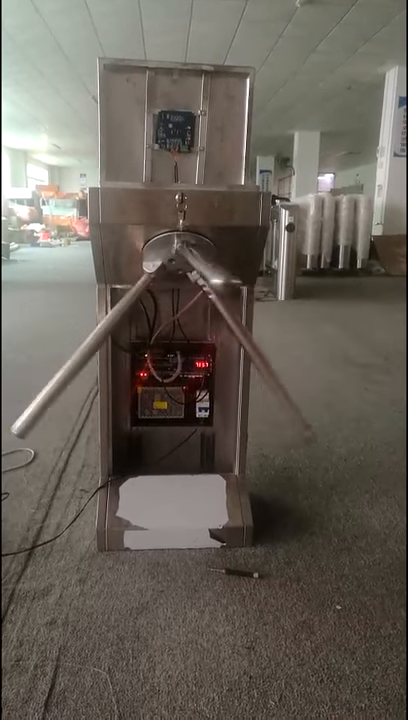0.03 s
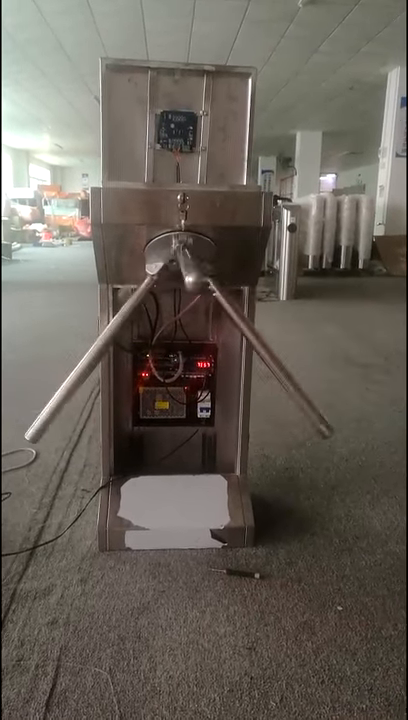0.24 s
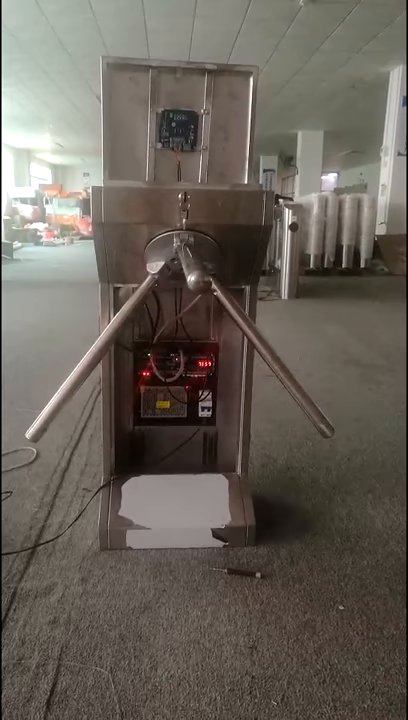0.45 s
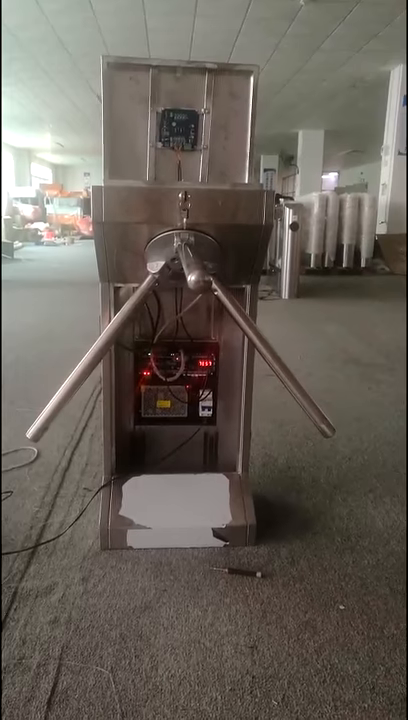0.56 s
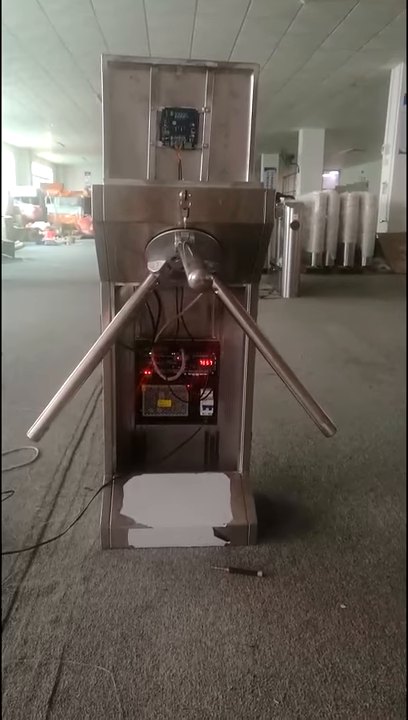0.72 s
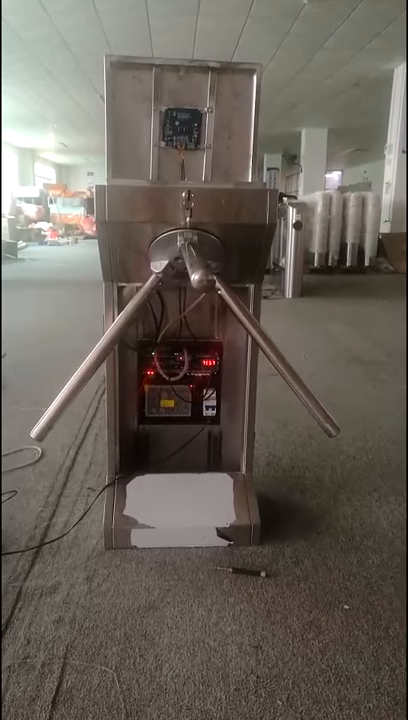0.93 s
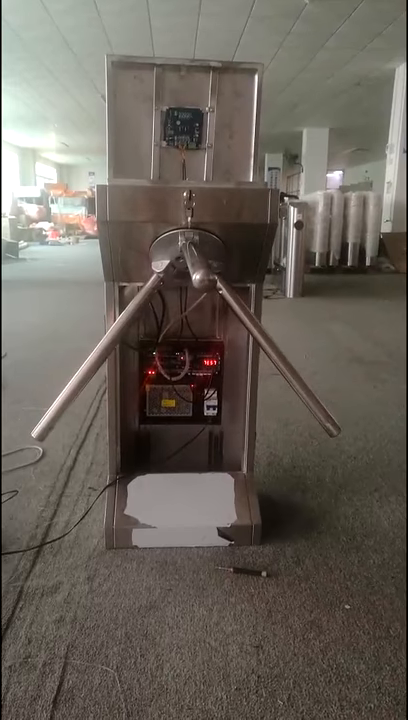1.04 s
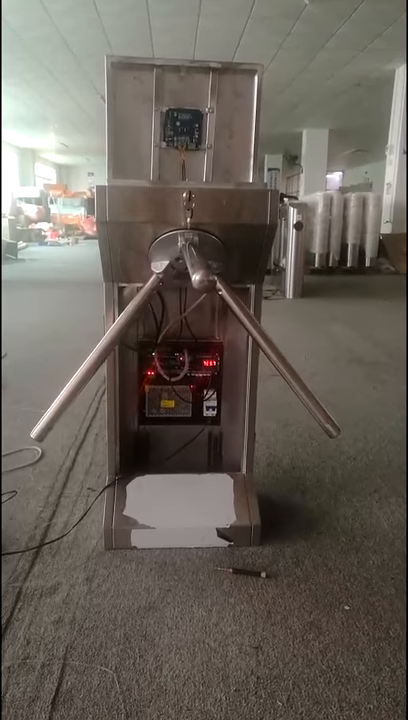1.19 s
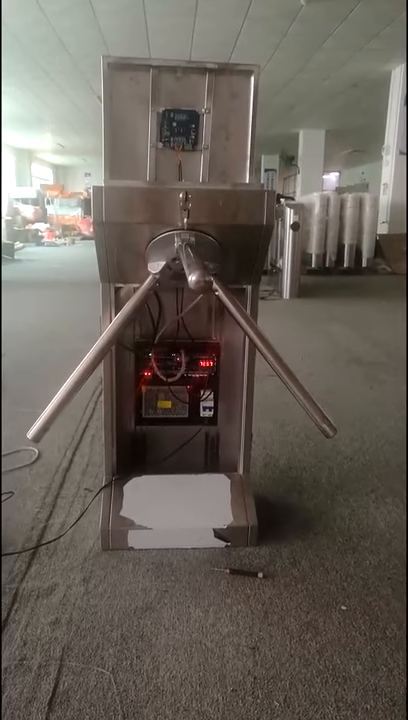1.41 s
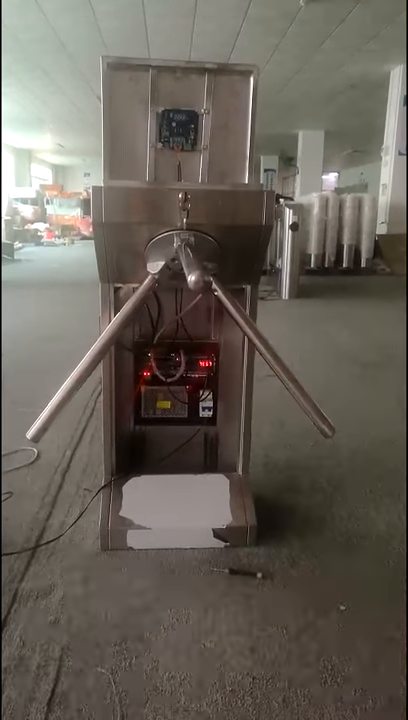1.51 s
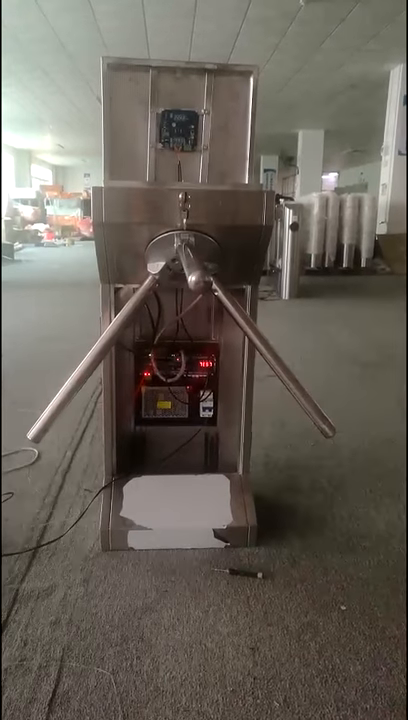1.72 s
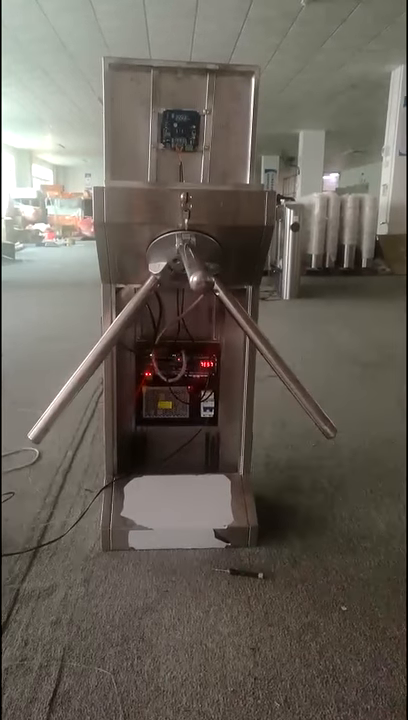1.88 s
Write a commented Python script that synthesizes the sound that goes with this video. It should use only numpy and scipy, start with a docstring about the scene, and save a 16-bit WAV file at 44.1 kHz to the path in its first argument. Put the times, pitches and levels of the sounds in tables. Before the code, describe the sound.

Turnstile arms click into place with a dull thud, the bearing creaks faintly, and about a second later the lock snaps hard, the hollow cabinet shuddering; mono microphone nearby, reverberant hall with low background hum.

```python
"""The arms of a steel tripod turnstile swing home in a large, faintly humming hall.
The catch ticks (filtered noise bursts and modes) and the rotor leans into its buffer with a low thud of panel modes;
the bearing rubs as coloured noise and squeaks faintly as wavering sines while the arms creep on.
About a second later the lock snaps shut with a sharp clack of noise bursts and ringing modes,
and the sheet-metal cabinet shudders; noise tails supply the reflections."""
import sys
import numpy as np
from scipy import signal
from scipy.fft import irfft
from scipy.io import wavfile
from scipy.ndimage import uniform_filter1d

SR = 44100
rng = np.random.default_rng(int(sys.argv[2]) if len(sys.argv) > 2 else 0)


def unload_wav(signal):
    """Save mono or channel-first audio to the path in sys.argv[1] as 16-bit WAV at rate SR, clipped to [-1, 1]."""
    wavfile.write(
        sys.argv[1],
        SR,
        np.round(np.clip(np.atleast_2d(signal).T, -1, 1) * 32767).astype(np.int16),
    )


N = 85995
T = np.arange(N) / SR

# Spectrum of the hall background. Each row: frequency in Hz, relative density in dB per Hz.
AIR_COLOUR = [(25, -39), (45, -20), (70, -0.5), (96, -4.5), (120, 0), (190, 0.5), (310, -0.5), (470, -6.5),
              (900, -10), (1100, -9.5), (1400, -10.5), (2600, -14), (3200, -20), (4500, -27.5),
              (6000, -29.5), (7500, -35), (8700, -40.5), (10500, -44), (14000, -44.5)]
# Course of the background. Each row: time in seconds, relative level in dB.
AIR_LEVEL = [(0, 2.5), (.3, 2), (.65, 0), (.88, -.5), (1.25, 1.5), (1.8, 1)]
# Steady hum. Each row: frequency in Hz, level in dB.
HUM_TONES = [(121, -53.5), (247, -57.5), (300, -50.5), (403, -58)]
AIR_DB = -39.5

# Course of the rotor's rubbing. Each row: time in seconds, level in dB.
RUB_LEVEL = [(0, -60.5), (.18, -46), (.205, -37), (.245, -39), (.285, -48), (.37, -49.5), (.5, -42.5),
             (.66, -45.5), (.85, -53.5), (1.2, -57)]
# Spectrum of the rubbing. Each row: frequency in Hz, relative level in dB.
RUB_COLOUR = [(200, 10.5), (1000, -2.5), (2600, 5), (3400, -10), (7000, -14), (9000, -25), (14000, -33)]
# Bearing squeaks. Each row: start in seconds, length in seconds, mean frequency in Hz, level in dB.
SQUEAKS = [(.035, .085, 1055, -47), (.125, .02, 1690, -44), (.465, .04, 1390, -47),
           (0.521, 0.017, 1560, -42), (0.544, 0.03, 1520, -41), (0.587, 0.06, 1776, -44),
           (.662, 0.043, 1816, -44)]
SQUEAK_WIDTH_HZ, SQUEAK_GRAIN = 31.6, 0.5  # scale of the pitch waver; depth of the roughness

# Light touches of the pawl. Each row: start in seconds, relative level of the low modes in dB,
# relative level of the high modes in dB.
PAWL_TOUCHES = [(0.184, -23.5, -12), (1.3315, -7, -13), (1.335, 0, -0.5), (1.3405, -3.5, -6.5)]
# Low, then high modes of the pawl. Each row: frequency in Hz, relative level in dB, t60 in seconds.
PAWL_LOW_MODES = [(2130, -21.5, .12), (2487, -17.5, .12), (2690, -21.5, 0.047), (3840, -32.5, 0.0509),
                  (4850, -32.5, 0.037)]
PAWL_HIGH_MODES = [(7430, -29, .035), (7840, -27, 0.051)]

# Ticks of the catch. Each row: start in seconds, relative level in dB, brightness in dB per octave,
# level of the ringing relative to its tick in dB.
CATCH_TICKS = [(0.1871, -7, -1, 5.5), (0.2104, -2, 1, 1), (.228, -12.5, 3, -6.5), (.4066, -17, 4, -14)]
# Spectrum of the catch. Each row: frequency in Hz, relative level in dB.
CATCH_COLOUR = [(200, -7.5), (700, 0), (1250, 8), (2400, -1), (3300, -9), (4700, -1.5), (7500, -8.5),
                (8500, -18), (9300, -8.5), (10200, -32.5), (12500, -26.5), (14000, -34)]
# Modes of the catch. Each row: frequency in Hz, relative level in dB, t60 in seconds.
CATCH_MODES = [(1255, -43, .25), (4620, -42, .13), (4800, -44, .15), (4930, -46.5, .1), (6150, -52, .15)]
CATCH_DB, CATCH_T60_S = -28, 0.078

# Knocks on the cabinet. Each row: start in seconds, relative level in dB, rise in seconds, t60 in seconds,
# brightness in dB per octave, relative level of the lid's ring in dB.
KNOCKS = [(.203, -3.5, .008, 0.46, -1, -9), (1.338, -5, 0.024, 0.79, 2.5, 2.5),
          (1.42, -1, 0.0083, 0.35, -2.5, -9), (1.453, 2.5, 0.009, 0.24, 0.66, 2.5),
          (1.52, -3.5, .015, 0.27, -4, -12), (1.578, -6, 0.011, .7, 1, -13)]
# Spectrum of the shudder. Each row: frequency in Hz, relative level in dB.
SHUDDER_COLOUR = [(30, -70.5), (55, -42.5), (85, -15.5), (125, -6), (170, -7), (260, -3.5), (340, -1),
                  (410, -9), (530, -9.5), (680, -10.5), (1200, -23.5), (2500, -28.5), (6000, -59.5)]
# Modes of the lid. Each row: frequency in Hz, relative level in dB, t60 in seconds.
LID_MODES = [(165.7, -34.5, .55), (212.1, -37.5, 0.54), (305.3, -37, 0.28), (350, -24, 0.28),
             (368, -35.5, 0.43), (455, -37.5, 0.46), (527.3, -37, 0.44)]
SHUDDER_DB = -27

# Cabinet panel modes driven by the buffer. Each row: frequency in Hz, peak level in dB.
PANEL_MODES = [(117, -34.5), (137.2, -18.5), (167.6, -27.5), (187.8, -26.5), (204, -33.5), (245, -38),
               (301, -38), (366, -41)]
PRESS_S, PRESS_RISE_S, PRESS_HOLD_S, PRESS_RELEASE_S = 0.266, 0.038, 0.054, 0.05

# Blows of the lock. Each row: start in seconds, relative level in dB, brightness in dB per octave.
LOCK_BLOWS = [(1.3355, -7.5, -1.5), (1.3478, -2.5, 0.95), (1.354, -4, -4.5), (1.3693, -7.5, -5.5),
              (1.396, -12.5, -0.5)]
# Spectrum of a blow. Each row: frequency in Hz, relative level in dB.
CRACK_COLOUR = [(150, -26.5), (600, -12), (1000, -12), (1500, 0.5), (2000, 2.5), (2600, 2.5), (3150, -10.5),
                (3700, -1.5), (4800, -9.5), (5800, -4), (7800, -15), (8800, -21), (10500, -34.5),
                (12600, -30.5), (14000, -43.5)]
CRACK_DB, CRACK_T60_S = -16.5, 0.071

# Modes of the lock and frame, in three parallel lists: frequency in Hz, level in dB, t60 in seconds.
FRAME_HZ = [1187, 1300, 1749, 1870, 2018, 2130, 2245, 2404, 2464, 2528, 2626, 2704, 3777, 4038, 5675, 7912]
FRAME_DB = [-40, -37.5, -32.5, -33, -30.5, -28.5, -32.5, -28, -26.5, -33.5, -34, -34, -40.5, -40.5, -38,
            -46]
FRAME_T60_S = [0.54, 0.33, .35, 0.27, .4, .33, 0.19, .22, .2, 0.25, .2, .18, .22, .13, 0.14, .18]
FRAME_START_S = 1.3475

# Decay of the hall. Each row: frequency in Hz, t60 in seconds.
HALL_DECAY = [(120, 1.5), (500, 0.77), (2000, 0.89), (5000, .6), (8000, 0.32), (13000, 0.44)]
STEEL_WET_DB, THUD_WET_DB, SHUDDER_WET_DB = -9, -18.5, -13.5
RING_WET_DB = -8  # share of the pure ringing in both kinds of reflection
NEAR_WET_DB, NEAR_T60_S = -9, 0.54
REFLECTION_DELAY_S = 0.012
PIVOT_HZ = 2500  # brightness tilts pivot about this frequency
LOW_CUT_HZ, EDGE_HZ, STOP_S = 42, 13950, 1.804


def amp(db):
    """Amplitude ratio: twenty decibels make a factor of ten."""
    return 10 ** (np.asarray(db) / 20)


def unit(x):
    """Normalization: scales to an rms of one."""
    return x / np.sqrt(np.mean(x ** 2) + 1e-20)


def read(points, hz):
    """Interpolation of a spectrum along a logarithmic frequency axis."""
    f, value = np.transpose(points)
    return np.interp(np.log(hz + 1), np.log(f + 1), value)


def level(points):
    """Envelope: gain over time, with straight lines in decibels between the points."""
    return amp(np.interp(T, *np.transpose(points)))


def delayed(x, s):
    """Time shift: starts a sound at s seconds."""
    silence = np.zeros(max(round(s * SR), 0))
    return np.concatenate([silence, x])[:N]


def noise(colour):
    """Stationary noise by spectral synthesis: a set magnitude with random phases."""
    hz = np.fft.rfftfreq(N, 1 / SR)
    phase = 2 * np.pi * rng.random(len(hz))
    return unit(irfft(amp(read(colour, hz)) * np.exp(1j * phase), N))


def ring(modes, rise):
    """Modal superposition: a struck part sounds as a sum of exponentially dying sines."""
    onset = np.minimum(T / rise, 1)
    return onset * sum(amp(db - 60 * T / t60) * np.sin(2 * np.pi * hz * T) for hz, db, t60 in modes)


def coloured(x, colour, tilt_db=0):
    """Linear filtering by a causal minimum-phase response of unit power, tilted in dB per octave."""
    hz = abs(np.fft.fftfreq(8192, 1 / SR))
    tilt = tilt_db * np.log2((hz + 1) / PIVOT_HZ)
    gain = unit(amp(read(colour, hz) + tilt))
    # the Hilbert transform of the log gain gives the minimum phase
    spectrum = np.exp(np.conj(signal.hilbert(np.log(gain + 1e-6))))
    response = np.fft.ifft(spectrum).real
    return signal.fftconvolve(x, response[:len(hz) // 2])[:N]


def burst(colour, tilt_db, rise, t60):
    """High modal density: many overlapping modes behave as exponentially dying filtered noise."""
    envelope = np.minimum(T / rise, 1) * amp(-60 * T / t60)
    return coloured(envelope * rng.choice([-1, 1], N), colour, tilt_db)


def echoes(x, decay):
    """Diffuse reverberation: convolution with noise whose bands each die at their own rate."""
    hz, t, z = signal.stft(rng.standard_normal(N), SR, nperseg=256)
    dying = z * amp(-60 * t / read(decay, hz)[:, None])
    tail = signal.istft(dying, SR, nperseg=256)[1][:N]
    response = delayed(tail / np.linalg.norm(tail), REFLECTION_DELAY_S)
    return signal.fftconvolve(x, response)[:N]


def hall_air():
    """Stationary noise and tones: a broadband wash of the hall with a faint machine hum."""
    hum = sum(amp(db) * np.sin(2 * np.pi * (hz * T + rng.random())) for hz, db in HUM_TONES)
    return amp(AIR_DB) * level(AIR_LEVEL) * noise(AIR_COLOUR) + hum


def bearing():
    """Friction: the rotor scrapes and rubs as broadband noise, with faint, grainy, wavering squeaks."""
    out = level(RUB_LEVEL) * noise(RUB_COLOUR)
    for s, length, hz, db in SQUEAKS:
        waver, grain = unit(uniform_filter1d(rng.standard_normal((2, N)), size=200))
        arch = np.sqrt(abs(np.sin(np.pi * np.clip((T - s) / length, 0, 1))))
        phase = 2 * np.pi * np.cumsum(hz + SQUEAK_WIDTH_HZ * waver) / SR
        roughness = unit(1 + SQUEAK_GRAIN * grain)
        out = out + amp(db) * arch * roughness * np.sin(phase)
    return out


def pawl(rise_s=0.0025):
    """Free vibration: the small pawl rings in its own modes as it slides off its tooth."""
    low, high = ring(PAWL_LOW_MODES, rise_s), ring(PAWL_HIGH_MODES, rise_s)
    return sum(delayed(amp(db) * low + amp(high_db) * high, s) for s, db, high_db in PAWL_TOUCHES)


def catch(rise_s=0.0015):
    """Impact excitation: the catch ticks three times in quick succession, and once more, faintly, a little later."""
    modes = ring(CATCH_MODES, rise_s)
    out = np.zeros(N)
    for s, db, tilt, modes_db in CATCH_TICKS:
        click = amp(CATCH_DB) * burst(CATCH_COLOUR, tilt, rise_s, CATCH_T60_S)
        out += delayed(amp(db) * (click + amp(modes_db) * modes), s)
    return out


def cabinet():
    """Plate vibration: knocks excite dense modes of the sheet metal and separate modes of the open lid."""
    out = np.zeros(N)
    for s, db, rise, t60, tilt, lid_db in KNOCKS:
        shudder = amp(SHUDDER_DB + db) * burst(SHUDDER_COLOUR, tilt, rise, t60)
        lid = amp(lid_db) * ring(LID_MODES, rise)
        out += delayed(shudder + lid, s)
    return out


def thud():
    """Forced vibration: the buffer loads the panels, holds them shaking and then damps them."""
    t = T - PRESS_S
    loading = (np.minimum(t, 0) / PRESS_RISE_S) ** 2
    damping = (np.maximum(t - PRESS_HOLD_S, 0) / PRESS_RELEASE_S) ** 2
    return np.exp(-loading - damping) * sum(amp(db) * np.cos(2 * np.pi * hz * t) for hz, db in PANEL_MODES)


def lock(rise_s=0.00037):
    """Impact excitation: each blow of the bolt is a dense metallic crack with a very short rise."""
    return sum(delayed(amp(CRACK_DB + db) * burst(CRACK_COLOUR, tilt, rise_s, CRACK_T60_S), s)
               for s, db, tilt in LOCK_BLOWS)


def frame(rise_s=0.0059):
    """Free vibration: the lock and its frame ring on in their modes from the hardest blow."""
    return delayed(ring(zip(FRAME_HZ, FRAME_DB, FRAME_T60_S), rise_s), FRAME_START_S)


def scene():
    """Superposition of the mechanism, its reflections in the casing and the hall, and the background."""
    ringing = pawl() + frame()
    steel = catch() + lock()
    low, shudder = thud(), cabinet()
    thrown = steel + amp(RING_WET_DB) * ringing
    near = amp(NEAR_WET_DB) * echoes(thrown, [(1000, NEAR_T60_S)])  # one t60 for all bands
    to_hall = amp(STEEL_WET_DB) * thrown + amp(THUD_WET_DB) * low + amp(SHUDDER_WET_DB) * shudder
    far = echoes(to_hall, HALL_DECAY)
    return (ringing + steel + low + shudder + near + far + bearing() + hall_air())[None]


def record(dry):
    """Band limitation: the microphone sheds the deepest bass, the sound stops short, a steep low-pass follows."""
    high_pass = signal.butter(3, LOW_CUT_HZ, "high", fs=SR, output="sos")
    thinned = signal.sosfilt(high_pass, dry)
    low_pass = signal.firwin(401, EDGE_HZ, window=("kaiser", 8), fs=SR)
    return signal.oaconvolve(thinned * (T < STOP_S), low_pass[None], "same")


dry = scene()
out = record(dry)
unload_wav(out)
```